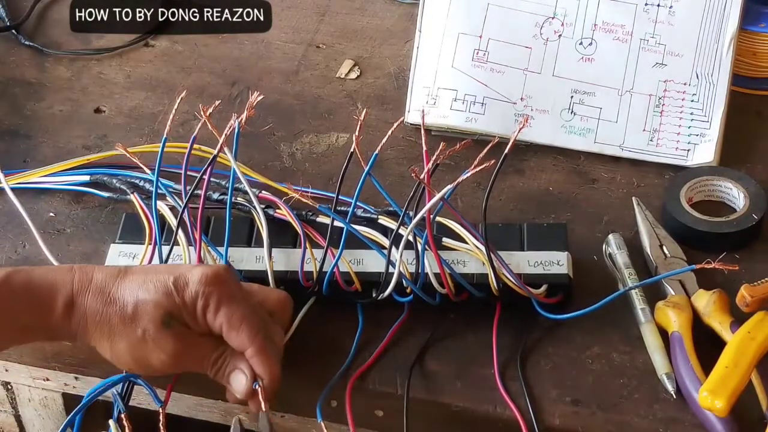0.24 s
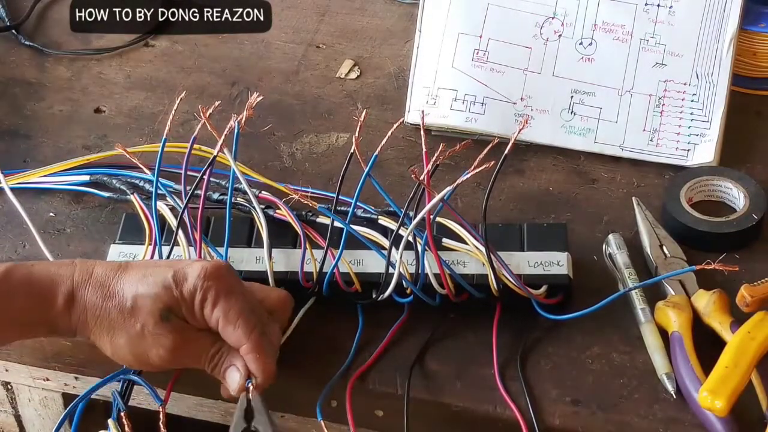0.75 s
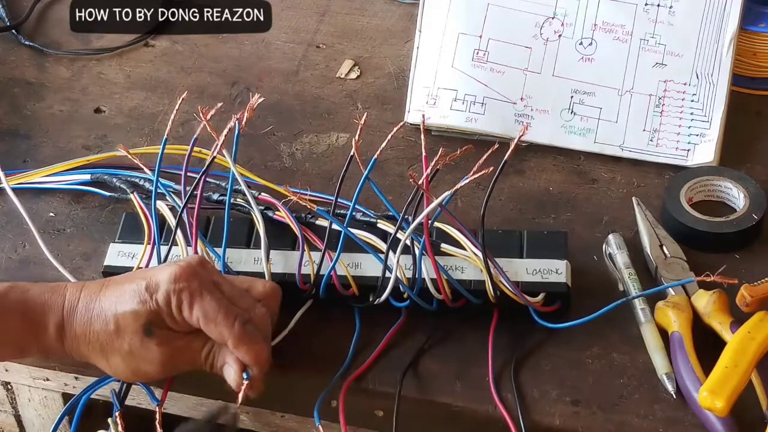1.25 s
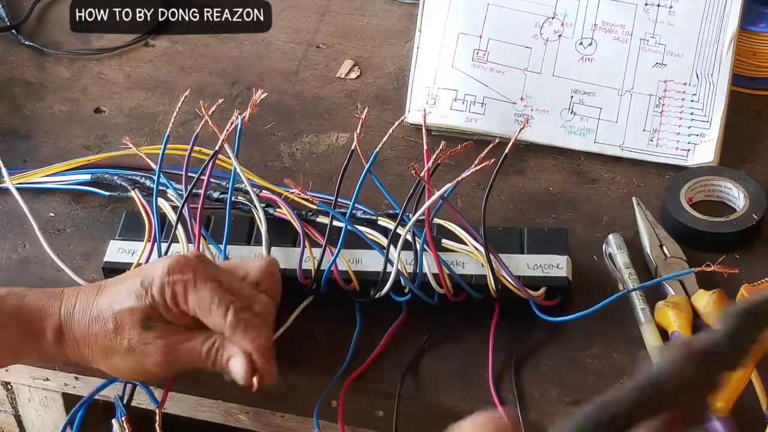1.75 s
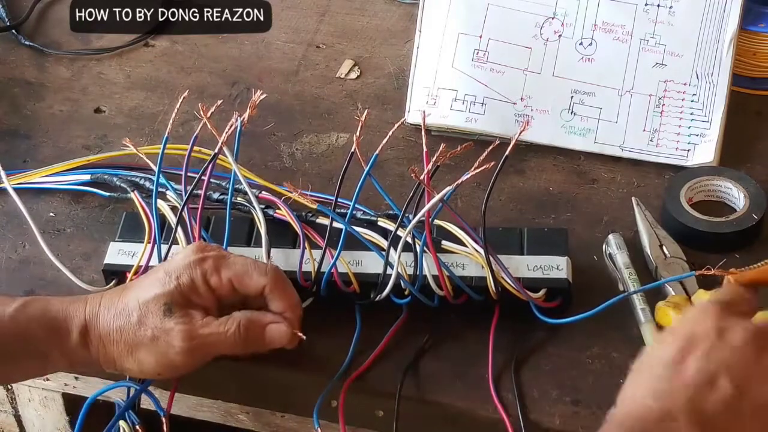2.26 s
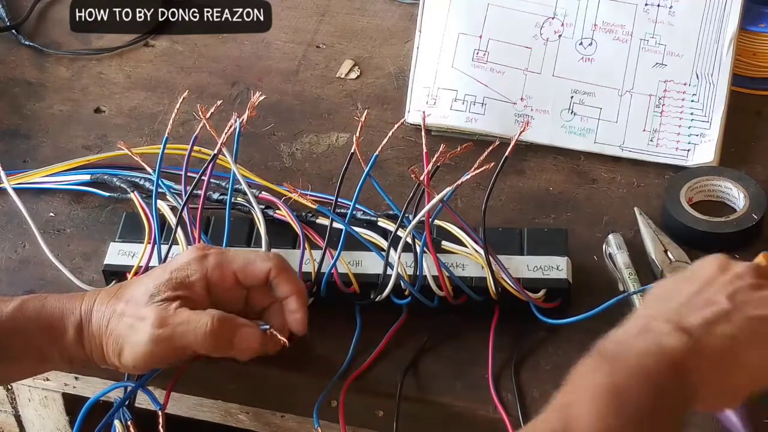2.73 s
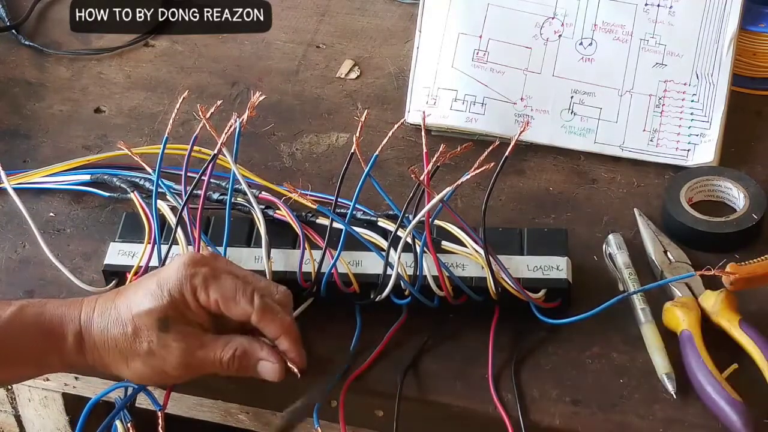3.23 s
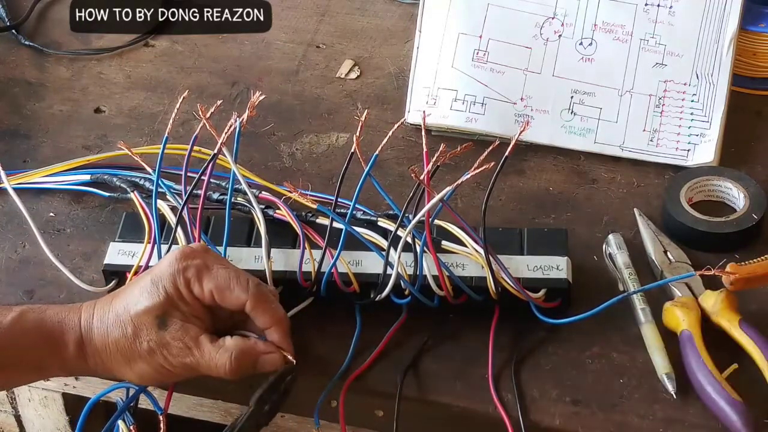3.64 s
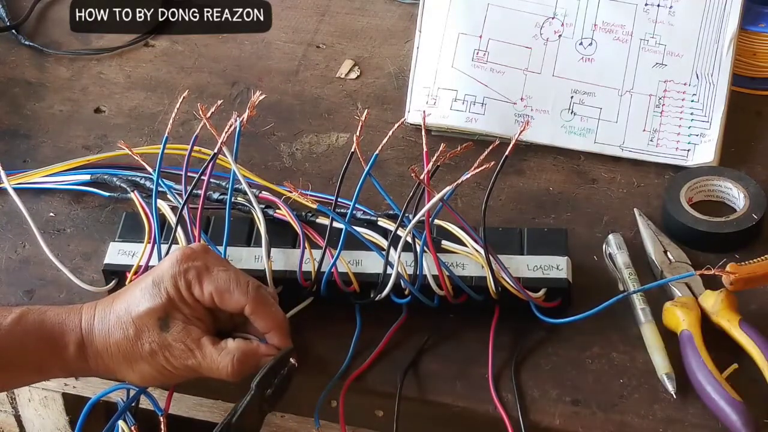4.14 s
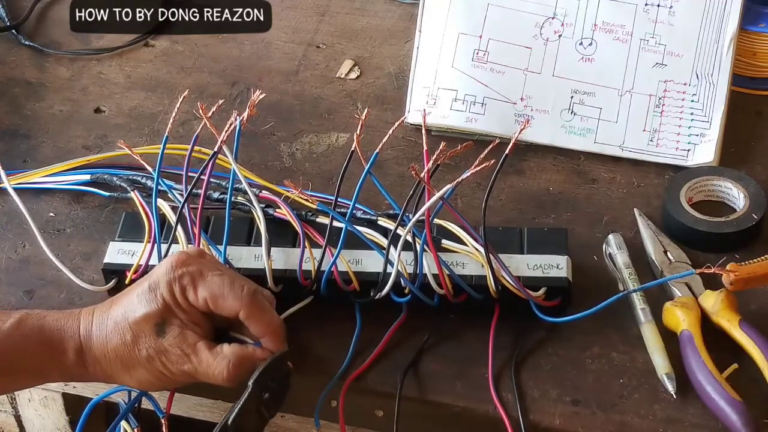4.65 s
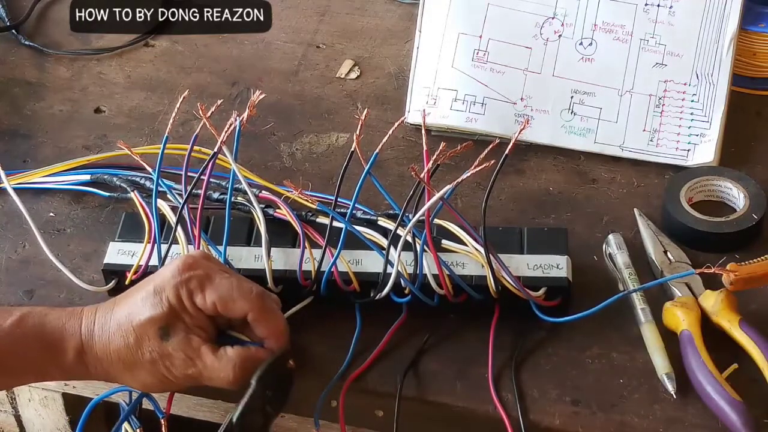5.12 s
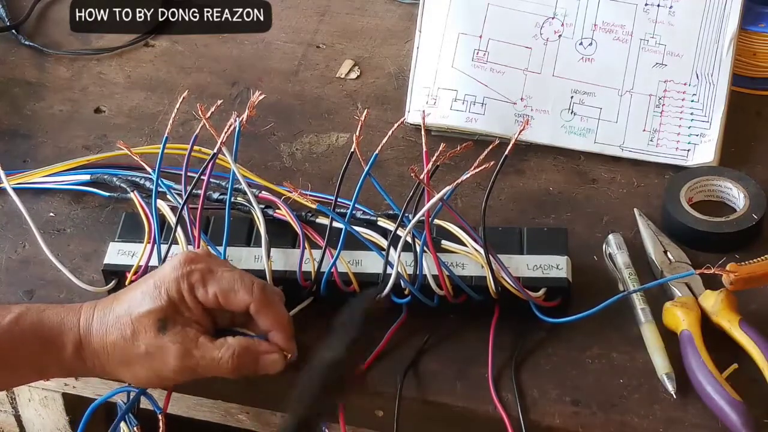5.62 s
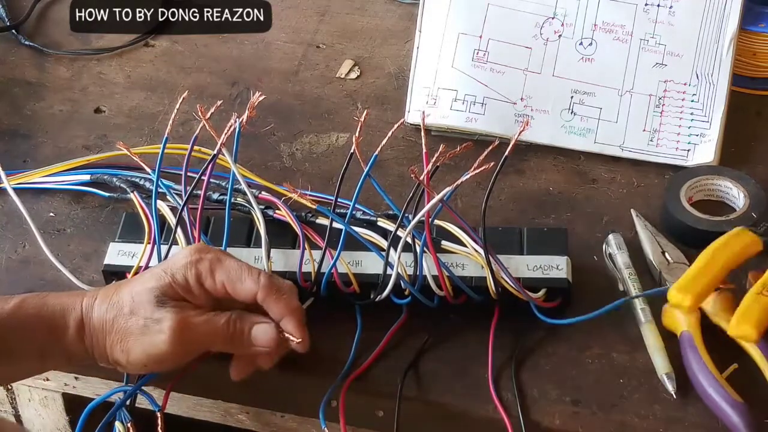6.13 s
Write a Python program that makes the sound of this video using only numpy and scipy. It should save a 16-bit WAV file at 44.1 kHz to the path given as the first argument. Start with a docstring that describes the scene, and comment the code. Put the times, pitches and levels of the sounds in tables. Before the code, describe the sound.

Quiet shed by a road: small steel clicks, one loud tool clatter, light clinks, then a puttering single-cylinder motorbike approaching and a sharp bench knock.

```python
"""A workbench in a shed open to a road, heard by two microphones a hand's width apart.
Far off, flickering noise bands make the street's hiss; a vehicle's rumble and engine notes fade away.
A single-cylinder motorbike draws near, its firings ringing pipe notes with a few stronger low pops, and
swings left and part way back. On the bench pliers snip wire, are dropped among other tools and picked up
again: each touch is a scatter of contacts that rings wood and steel. The shed echoes bench and exhaust."""
import sys
import numpy as np
from scipy import signal
from scipy.fft import rfft, irfft, next_fast_len
from scipy.io import wavfile
from scipy.ndimage import map_coordinates

SR = 44100
rng = np.random.default_rng(int(sys.argv[2]) if len(sys.argv) > 2 else 0)


def digitize_waveform(pressure):
    """Quantize a signal to 16-bit integers and store it at the path in sys.argv[1].

    Rows of a 2-D input are taken as channels; values are limited to [-1, 1].
    """
    field = np.atleast_2d(pressure).T
    bounded = np.clip(field, -1, 1)
    quanta = np.round(bounded * 32767).astype(np.int16)
    wavfile.write(sys.argv[1], SR, quanta)


N = 281358

# Tools knocking on the bench and, from 5.9 to 6.3 s, stronger exhaust pops of the nearing motorbike:
# start_s, thud_db, fullest_hz, knock_db, steel_db, brightest_hz, chatter_ms
KNOCKS_AND_POPS = [(.768, -41, 440, -36.5, -34, 4900, 6.5), (.796, -44, 450, -42, -52, 6400, 6.5),
                   (.926, -58, 600, -43, -36.5, 3600, 1.3), (.9295, -46.5, 550, -40, -40.5, 4600, 2.7),
                   (.9355, -56, 710, -38, -46, 3600, 2.7), (1.36, -42, 625, -36, -52, 3400, 1.3),
                   (1.367, -51, 520, -54, -61, 3400, 1.9), (1.376, -49, 650, -61, -47, 4340, 7.3),
                   (1.388, -51.5, 560, -53, -57, 4340, 6), (1.403, -56, 560, -52, -60, 4340, 6),
                   (1.417, -50, 450, -48, -58, 4340, 18), (1.432, -49.5, 500, -58, -60, 4340, 4.5),
                   (2.2005, -42, 500, -31, -29, 2800, 2.2), (2.2028, -22.5, 570, -16.5, -26.5, 5400, 3.2),
                   (2.2065, -21.5, 470, -27, -39, 6600, 3.4), (2.2135, -26, 650, -38, -28, 4340, 3),
                   (2.2215, -25.5, 680, -28, -35, 4340, 3.6), (2.2245, -18, 890, -18, -20, 4900, 3.4),
                   (2.2295, -15.5, 490, -26, -37, 4370, 0.56), (2.237, -22, 490, -36, -27, 4360, 1.8),
                   (2.2445, -33, 604, -16.5, -34, 4370, 3), (2.2485, -31, 550, -15.5, -36, 4000, 2.2),
                   (2.2525, -30.5, 597, -19.5, -27.5, 4070, 4.9), (2.2605, -25.5, 620, -25, -32, 4000, 10),
                   (2.272, -32, 550, -31, -29, 4400, 4.8), (2.282, -37, 610, -31, -36, 4400, 9.2),
                   (2.309, -31, 655, -36, -33, 5000, 25), (2.336, -35.5, 600, -43, -51, 6000, 10),
                   (2.39, -47, 500, -45, -50, 6000, 15), (2.415, -47.5, 503, -52, -46, 6000, 14),
                   (3.0495, -49, 1000, -46, -62, 4500, 20), (5.99, -34.5, 450, -44, -50, 4500, 3.6),
                   (6.097, -39, 470, -50, -50, 4470, 2), (6.185, -36.5, 645, -50, -48, 4500, 2.5),
                   (6.29, -36.5, 430, -50, -48, 4500, 2), (6.357, -32.5, 535, -23, -29, 4750, 4.4),
                   (6.361, -19.5, 119, -40, -40, 4800, 2), (6.365, -32, 536, -25, -31, 4830, 2.7)]
POPS_FROM_S, POPS_TO_S = 5.9, 6.3


def amp(db):
    """Amplitude gain of a level in dB."""
    return 10 ** (np.asarray(db) / 20)


def rms_one(x):
    """Scale to unit power."""
    return x / np.sqrt(np.mean(x ** 2) + 1e-20)


def in_time(rows):
    """Columns of a table whose first column is seconds, drawn out to one value per sample."""
    seconds, *columns = np.transpose(rows)
    return [np.interp(np.arange(N) / SR, seconds, column) for column in columns]


def at_hz(points, hz):
    """Value of a spectrum at one frequency, read along a logarithmic frequency axis."""
    points = np.array(points)
    return np.interp(np.log(hz), np.log(points[:, 0]), points[:, 1])


def drift(rate_hz):
    """Slow random wander of unit power: noise through two equal low-pass poles, one value per 40 samples."""
    pole = np.exp(-80 * np.pi * rate_hz / SR)
    noise = rng.standard_normal(N // 40 + 2002)
    slow = signal.lfilter([1], [1, -2 * pole, pole * pole], noise)[2000:]
    return np.interp(np.arange(N) / 40, np.arange(len(slow)), rms_one(slow))


def ring(clicks, hz, t60_s):
    """A resonance: each unit click sets off a sine of height 1 that falls by 60 dB in t60_s."""
    radius, angle = amp(-60 / (t60_s * SR)), 2 * np.pi * hz / SR
    poles = [1, -2 * radius * np.cos(angle), radius * radius]
    return signal.lfilter([0, np.sin(angle)], poles, clicks + 1e-18)


def from_side(x, lead_ms):
    """The same sound at both microphones, earlier at the left one by lead_ms."""
    i = np.arange(N)
    half_lead = lead_ms * SR / 2000     # samples
    return map_coordinates(x, [[i + half_lead, i - half_lead]], order=3, mode="nearest")


def road_noise(spectrum, patchy_db, direct, lead_ms):
    """Flickering half-octave noise bands; a share comes straight from one side, the rest is scattered."""
    # How alike scattered sound is at the two microphones: hz, likeness (1 same, 0 unrelated)
    likeness = [(30, 0), (100, 0), (300, 0.5), (700, 0.39), (1500, 0.031), (13000, 0)]
    bands = np.zeros((3, N))     # straight, scattered left, scattered right
    together = drift(1.0)
    edges_hz = 22 * 2 ** np.arange(0, 10, .5)
    white = rng.standard_normal((2, 3, N))     # neighbouring bands take different noise
    for k, (low_hz, high_hz) in enumerate(zip(edges_hz, edges_hz[1:])):
        if low_hz > spectrum[-1][0]:
            break
        band_pass = signal.butter(2, [low_hz, high_hz], "band", fs=SR, output="sos")
        straight, mid, side = signal.sosfilt(band_pass, white[k % 2])
        hz = np.sqrt(low_hz * high_hz)
        alike = np.clip(at_hz(likeness, hz), -1, 1)
        share = direct * min(1, (2500 / hz) ** .75)     # the treble is scattered more
        mid = np.sqrt((1 - share) * (1 + alike) / 2) * mid
        side = np.sqrt((1 - share) * (1 - alike) / 2) * side
        flicker_db = patchy_db * (0.35 * together + drift(10.7))
        gain = amp(at_hz(spectrum, hz) + flicker_db)
        bands += gain * np.array([np.sqrt(share) * straight, mid + side, mid - side])
    return rms_one(from_side(bands[0], lead_ms) + bands[1:])


def pipe_notes(per_s, pipe, uneven_db, swell_db, rough, start):
    """Firings, each a pulse and a puff of gas, ring the pipe; gives its notes and the puffs' shape."""
    turn = start + np.cumsum(per_s * (1 + .004 * drift(6.0))) / SR     # counts firings
    puff = np.exp(-4 * (turn % 1))
    pulses = np.diff(np.floor(turn), prepend=0)
    gas = rough * puff * rng.standard_normal(N) * np.sqrt(8 * per_s / SR)
    fired = (pulses + gas) * amp(uneven_db * drift(32))     # no two firings are equal
    notes = []
    for k, (hz, width_hz, level_db) in enumerate(pipe):
        swell = amp(level_db + swell_db * drift(4))     # walls let each note swell and sink
        notes.append(swell * (-1) ** k * ring(fired, hz, 2.2 / width_hz))
    return notes, puff


def shed(x):
    """Walls of the shed: ten feedback delays a side, duller on every round."""
    t60_s, wall_cut_hz = 0.31, 11000     # the cut holds for a 20 ms round; longer rounds are duller
    size = next_fast_len(N + SR)
    hz = np.arange(size // 2 + 1) * SR / size
    heard = np.zeros((2, len(hz)), complex)
    for k, lag_s in enumerate(np.geomspace(.0041, .037, 20)):
        delay = amp(-60 * lag_s / t60_s) * np.exp(-2j * np.pi * hz * lag_s)
        one_round = delay / (1 + 1j * hz * lag_s * 50 / wall_cut_hz)
        heard[k % 2] += (-1) ** (k // 2) * np.sqrt(lag_s / 0.026) * one_round / (1 - one_round)
    return irfft(rfft(x, size) * heard, size)[:, :N]


def street():
    """Far traffic wash, plus a leaving vehicle's rumble and engine, louder at the right microphone."""
    # Spectrum of the far wash: hz, relative level_db per Hz
    wash_spectrum = [(15, -56), (25, -27), (54, -23), (118, -1.5), (180, -9), (241, -2.5), (418, -3.5),
                     (530, -4.5), (829, -7), (897, -20), (997, -12), (3530, -15), (6500, -21), (11200, -31),
                     (12400, -35), (13500, -60)]
    # Spectrum of the leaving vehicle's rumble: hz, relative level_db per Hz
    rumble_spectrum = [(25, 1), (55, 8), (140, 3), (200, 3.5), (400, -22), (800, -86)]
    # Exhaust pipe notes of the leaving vehicle: hz, width_hz, relative level_db
    leaving_pipe = [(50.4, 29, 0.5), (95, 37, 3), (142, 86, 15), (184, 45, 7.5)]
    wash_steady_db, wash_start_db, wash_settle_s = -50, -42, 0.71
    rumble_steady_db, rumble_start_db, rumble_hold_s, rumble_settle_s = -59, -44.5, 0.17, 0.052
    firings_per_s, engine_start_db, engine_fade_db_per_s = 45, -39, 41
    lead_ms = .21
    t = np.arange(N) / SR
    # the street settles after the vehicle has gone: each noise sinks from a start level to a steady one
    wash_db = wash_steady_db + (wash_start_db - wash_steady_db) * np.exp(-t / wash_settle_s)
    rumble_sink = np.exp(-np.maximum(t - rumble_hold_s, 0) / rumble_settle_s)
    rumble_db = rumble_steady_db + (rumble_start_db - rumble_steady_db) * rumble_sink
    notes, _ = pipe_notes(np.full(N, firings_per_s), leaving_pipe,
                          uneven_db=1.0, swell_db=1.5, rough=.3, start=.97)
    engine = amp(engine_start_db - engine_fade_db_per_s * t) * rms_one(sum(notes))
    wash = amp(wash_db) * road_noise(wash_spectrum, 1.7, direct=.4, lead_ms=lead_ms)
    rumble = amp(rumble_db) * road_noise(rumble_spectrum, 2.4, direct=0.15, lead_ms=lead_ms)
    return wash + (rumble + engine) * amp([[-2.5], [2.5]])


def motorbike():
    """Firings ring the exhaust, chain and tyres roar; gives the exhaust alone and both as heard."""
    # Exhaust pipe notes: hz, width_hz, relative level_db
    exhaust_pipe = [(64, 15, -10), (125, 21, -6), (157, 22.3, -3), (249, 16, -5), (280.5, 15.3, -7.5),
                    (311, 27, -2), (330, 53, -0.5), (374.3, 27, 4.5), (410, 30, 5), (495, 23, 4.5),
                    (700, 34, 3), (765, 34, 7.5), (787, 25, 3.5), (995, 19, -2)]
    # Spectrum of the roar of chain and tyres: hz, relative level_db per Hz
    roar_spectrum = [(15, -49), (25, -19), (54, -13), (216, -12), (297, -6.5), (407, -6), (558, -6.5),
                     (807, -3.5), (1080, -3.5), (1700, -9.5), (2500, -8.5), (3260, -11.5), (4590, -14.5),
                     (6000, -20.5), (8630, -25), (13500, -46.5)]
    # The ride; road and walls favour one exhaust note after another:
    # time_s, roar_db, left microphone's lead_ms, favoured_hz, lift_db of the favoured note
    nearing = [(3.6, -62, 0.23, 400, 3), (4.12, -51.5, 0.22, 400, 11), (4.4, -50, 0.33, 396, 4.5),
               (4.5, -46, 0.27, 410, 10.5), (4.68, -45, 0.33, 393, 10.5), (4.8, -44, 0.26, 353, 9),
               (4.97, -39.5, 0.33, 375, 2.5), (5.08, -39.5, 0.34, 402, 12), (5.2, -39.5, 0.37, 373, 10.5),
               (5.35, -36, .38, 335, 11.5), (5.5, -33.5, 0.42, 400, 9), (5.68, -32, 0.457, 410, 0),
               (5.8, -31.5, 0.468, 297, 4), (5.97, -31, 0.47, 307, 4.5), (6.15, -30, 0.43, 305, 8.5),
               (6.28, -31, 0.41, 313, 0), (6.38, -32.5, 0.37, 330, 6.5)]
    firings_per_s = 31.1     # steady throttle
    near_db = -31     # roar when alongside
    thump_near_db, thump_follows = -43, 0.94     # low notes, and their share of the roar's swing in dB
    bark_near_db, bark_follows = -41.5, 0.74     # upper notes carry further
    favour_octaves, throb_db = 0.19, 2.5     # width of the favoured range; swell of the roar per firing
    t = np.arange(N) / SR
    roar_db, lead_ms, favoured_hz, lift_db = in_time(nearing)
    from_near_db = roar_db - near_db
    fade_in = np.clip((t - 3.2) / 0.38, 0, 1)     # it rises out of the wash
    notes, puff = pipe_notes(np.full(N, firings_per_s), exhaust_pipe,
                             uneven_db=2.5, swell_db=1.2, rough=.36, start=.47)
    for k, (hz, _, _) in enumerate(exhaust_pipe):
        octaves_off = np.log2(hz / favoured_hz)
        notes[k] = notes[k] * amp(lift_db * np.exp(-(octaves_off / favour_octaves) ** 2))
    thump = amp(thump_near_db + thump_follows * from_near_db) * rms_one(sum(notes[:6]))
    bark = amp(bark_near_db + bark_follows * from_near_db) * rms_one(sum(notes[6:]))
    exhaust = fade_in * (thump + bark)
    direct = np.clip(.78 + .03 * from_near_db, 0, .95)     # less comes straight from afar
    noise = road_noise(roar_spectrum, 1.0, direct=direct, lead_ms=lead_ms)
    roar = fade_in * amp(roar_db + throb_db * (puff - puff.mean())) * noise
    return exhaust, from_side(exhaust, lead_ms) + roar


def ring_length(t60_s, chatter_ms, longest):
    """Samples for which a note is worked out: its ring plus the chatter that feeds it."""
    return min(longest, int((t60_s + chatter_ms / 150) * SR))


def low_notes(contacts, first, thud_db, full_hz, knock_db, chatter_ms):
    """The wooden top's many short notes, thud below 1300 Hz and knock above; they also voice the pops."""
    # Notes of the bench top: hz, relative level_db, t60_s
    wood = [(97, -5.5, 0.2), (128, -14, 0.08), (152, -16.5, 0.3), (193, -16.5, 0.096), (226, -18, 0.08),
            (257.5, -14, 0.33), (288, -16.5, 0.09), (310, 7.5, 0.026), (342, 0.5, 0.059), (400, 9, 0.027),
            (429, 3.5, 0.04), (473, 5.5, 0.016), (503, 10.5, 0.026), (572, 8.5, 0.016), (614, -7.5, 0.08),
            (697, -3, 0.07), (796, 5, 0.052), (871, -9, 0.07), (1017, 7.5, 0.032), (1036, 6, 0.01),
            (1160, 6, 0.057), (1120, 13.5, 0.02), (1416, -7, 0.045), (1613, -18, 0.083), (1892, -5, 0.035),
            (1953, -20, 0.018), (2130, -6, 0.0076), (2204, -10, 0.036), (2437, -7.5, 0.044),
            (2670, -11.5, 0.016), (3180, -7.5, 0.014)]
    thud_fall_db = 10     # loss one octave from the fullest note; grows with the square of the octaves
    notes_in_step = 3     # neighbouring notes that start with the same sign
    size = contacts.shape[-1]
    dull = signal.butter(2, 3200, fs=SR, output="sos")     # wood yields, so the blow is dull
    blow = signal.sosfilt(dull, .35 * contacts + first)
    sound = np.zeros((2, size))
    for k, (hz, level_db, t60_s) in enumerate(wood):
        blow_db = knock_db
        if hz < 1300:
            blow_db = thud_db - thud_fall_db * (hz > 200) * np.log2(hz / full_hz) ** 2
        if hz < 120:
            blow_db += 0.082 * (thud_db + 29)     # heavier blows bring out the lowest notes slightly more
        felt = blow if hz > 550 else blow.mean(axis=0)     # low notes reach both microphones alike
        lasts = ring_length(t60_s, chatter_ms, size)
        sign = (-1) ** (k // notes_in_step)
        sound[:, :lasts] += amp(blow_db + level_db) * sign * ring(felt[..., :lasts], hz, t60_s)
    return sound


def high_notes(contacts, first, steel_db, bright_hz, chatter_ms):
    """Steel meets steel in separate sharp grains that ring short notes; they also edge the pops faintly."""
    # Notes of the steel jaws: hz, relative level_db, t60_s
    jaws = [(2830, 1, 0.011), (3420, 1.5, 0.0081), (3700, 3, 0.0077), (4310, -1, 0.014),
            (4850, 2.5, 0.0059), (5650, 0, 0.0085), (6360, -5.5, 0.037), (6950, -8.5, 0.029),
            (7300, 1, 0.0028), (7840, -7, 0.025), (8500, -4.5, 0.013), (9620, -3.5, 0.0047),
            (10100, -2.5, 0.0068), (11060, -2.5, 0.0076), (11600, -3, 0.0068), (13200, 0, .005)]
    size = contacts.shape[-1]
    grains = contacts * 2.5 * (rng.random(size) < .15)
    sharp = (grains + first / np.sqrt(1 + chatter_ms / 3))[:, :size // 3]
    luck_db = 2 * rng.standard_normal(len(jaws))     # where the jaws are struck
    sound = np.zeros((2, size))
    for k, (hz, level_db, t60_s) in enumerate(jaws):
        near_db = -14.0 * np.log2(hz / bright_hz) ** 2     # notes near the brightest one ring most
        lasts = ring_length(t60_s, chatter_ms, size // 3)
        gain = amp(steel_db + level_db + near_db + luck_db[k])
        sound[:, :lasts] += gain * (-1) ** k * ring(sharp[:, :lasts], hz, t60_s)
    return sound


def bursts(rows):
    """Each row is a first impulse and a dying scatter of noise that ring the low and high notes."""
    # left microphone's lead: early sounds, then later ones further right
    early_lead_ms, late_lead_ms, late_from_s = -.05, -.11, 2
    size = SR // 4
    t = np.arange(size) / SR
    first = t == 0
    out = np.zeros((2, N + size))
    for start_s, thud_db, full_hz, knock_db, steel_db, bright_hz, chatter_ms in rows:
        dying = np.exp(-t * 1000 / max(chatter_ms, .5))
        shared, left, right = rng.standard_normal((3, size)) * dying
        contacts = (shared + .9 * np.array([left, right])) / np.sqrt(chatter_ms * SR / 2000)
        sound = low_notes(contacts, first, thud_db, full_hz, knock_db, chatter_ms)
        sound += high_notes(contacts, first, steel_db, bright_hz, chatter_ms)
        lead_ms = early_lead_ms if start_s < late_from_s else late_lead_ms
        for side in (0, 1):
            at = round((start_s + (side - .5) * lead_ms / 1000) * SR)
            out[side, at:at + size] += sound[side]
    return out[:, :N]


def exhaust_pops():
    """Stronger exhaust pops: low thumps of the motorbike's firings as it comes near."""
    return bursts([row for row in KNOCKS_AND_POPS if POPS_FROM_S < row[0] < POPS_TO_S])


def tools():
    """Work at the wire, then at the pile of tools further right: knocks on wood and clinks of steel."""
    # Steel clinks on steel, the bench answers dully: start_s, steel_db, brightest_hz, thud_db, chatter_ms
    clinks = [(0.764, -32.5, 3400, -51, 8.3), (0.765, -28, 6700, -69, 8.4), (0.781, -33, 6270, -47, 3.8),
              (.789, -36.5, 6360, -48, 1.4), (.842, -42.5, 5030, -51.5, 4.2),
              (2.296, -32.5, 8300, -35.5, 1.5), (2.324, -36, 7600, -42, 1.7), (2.349, -34, 7540, -47, 1.4),
              (2.362, -41, 8000, -39, 7.4), (2.358, -37, 4200, -53, 12), (2.372, -42, 7040, -45, 4.2),
              (2.434, -40, 3100, -49, 2), (2.438, -45, 6500, -58, 2), (2.778, -45, 5540, -59, 11),
              (2.811, -52, 8500, -55, 2.1), (2.886, -44, 5940, -64, 3.4), (2.892, -41, 6960, -57, 11),
              (2.901, -49, 9950, -64, 2), (2.911, -40.5, 6960, -55.5, 4.5), (2.919, -48, 8400, -56, 8),
              (2.992, -45.5, 7500, -71, 1.7), (2.996, -49, 5200, -70, 2), (3.0464, -31.5, 12500, -59, 0.65),
              (3.0477, -38, 8250, -68, 1.5), (3.048, -35.5, 2880, -69, 2.7), (3.055, -41.5, 4700, -63, 17),
              (3.065, -51, 8300, -56, 12), (3.075, -42, 4700, -62, 15), (6.313, -24.5, 5100, -40, 6.3)]
    clink_thud_hz, clink_knock_db = 550, -12.5     # fullest bench note; upper bench notes under the steel
    touches = [row for row in KNOCKS_AND_POPS if not POPS_FROM_S < row[0] < POPS_TO_S]
    for start_s, steel_db, bright_hz, thud_db, chatter_ms in clinks:
        knock_db = steel_db + clink_knock_db
        touches.append((start_s, thud_db, clink_thud_hz, knock_db, steel_db, bright_hz, chatter_ms))
    return bursts(touches)


def scene():
    """Street, motorbike with its pops, and tools; tools, pops and exhaust also ring in the shed."""
    bursts_wet_db, exhaust_wet_db = -12.5, -6     # sent into the shed
    exhaust, bike = motorbike()
    no_deep_bass = signal.butter(3, 82, "high", fs=SR, output="sos")     # the bench is small
    near = signal.sosfilt(no_deep_bass, exhaust_pops() + tools())
    into_shed = amp(bursts_wet_db) * near.mean(axis=0) + amp(exhaust_wet_db) * exhaust
    return street() + bike + near + shed(into_shed)


def record(dry):
    """The loudest peaks are rounded and the top is cut, 70 dB down from 14200 Hz."""
    round_at = 1.4
    rounded = round_at * np.tanh(dry / round_at)
    return signal.sosfilt(signal.cheby2(12, 70, 14200, fs=SR, output="sos"), rounded)


dry = scene()
out = record(dry)
digitize_waveform(out)
```